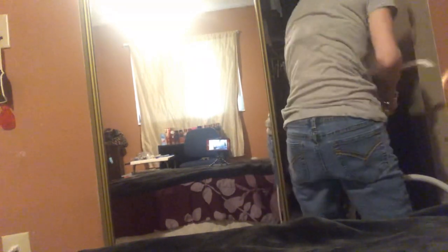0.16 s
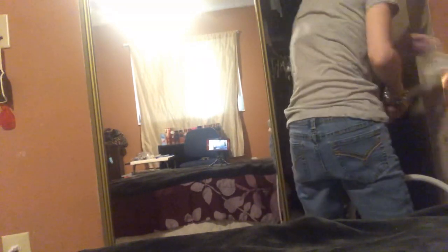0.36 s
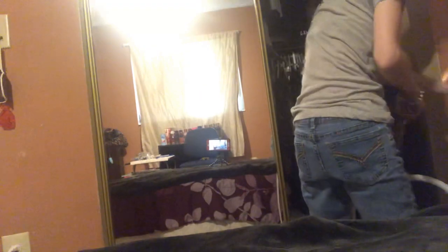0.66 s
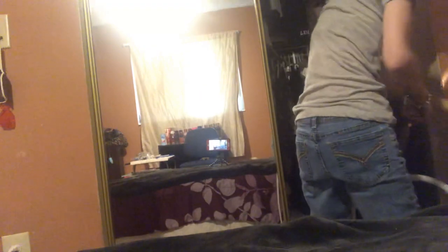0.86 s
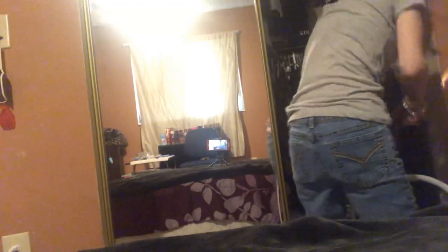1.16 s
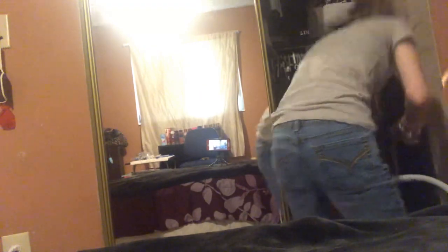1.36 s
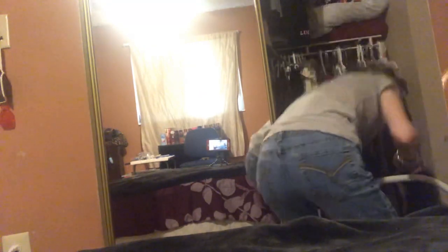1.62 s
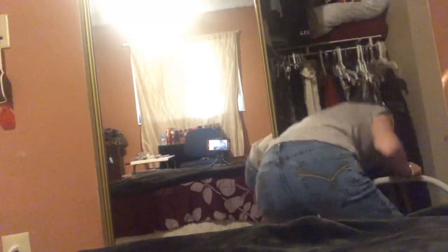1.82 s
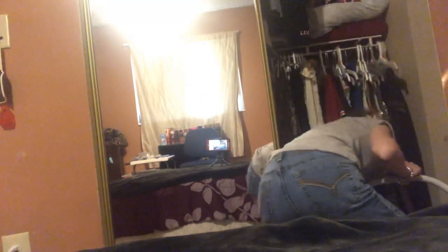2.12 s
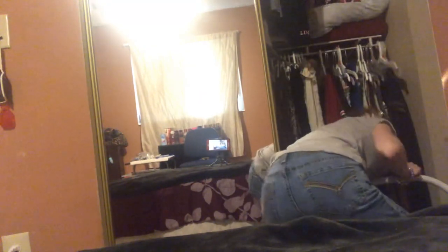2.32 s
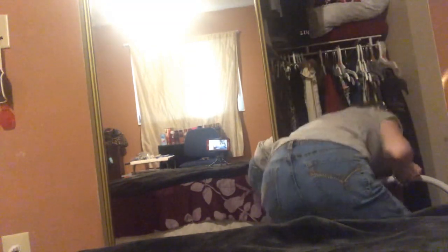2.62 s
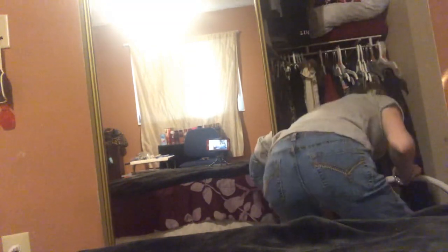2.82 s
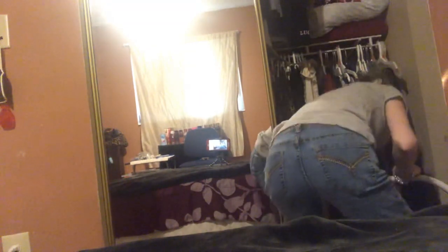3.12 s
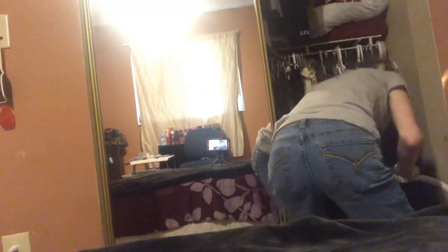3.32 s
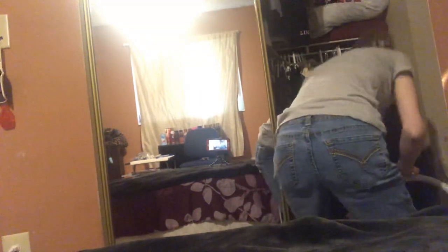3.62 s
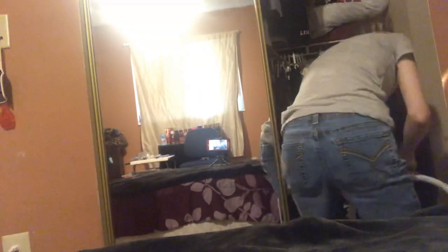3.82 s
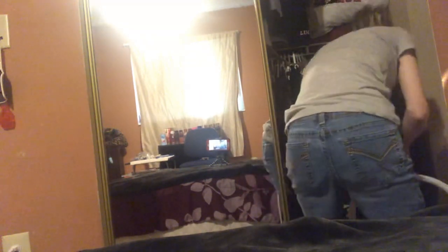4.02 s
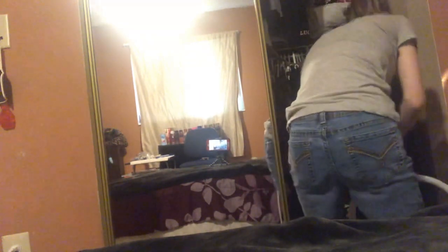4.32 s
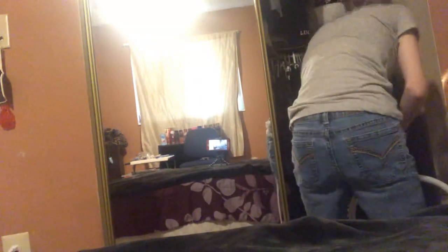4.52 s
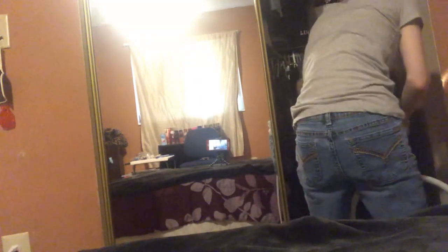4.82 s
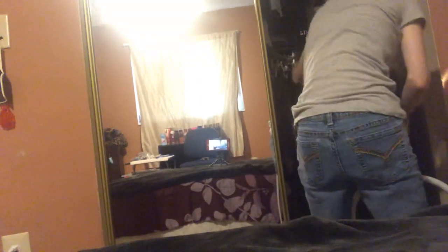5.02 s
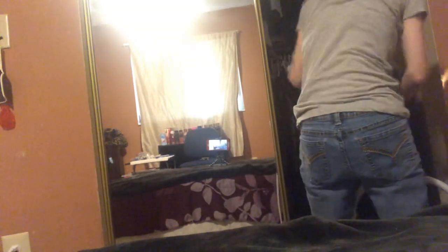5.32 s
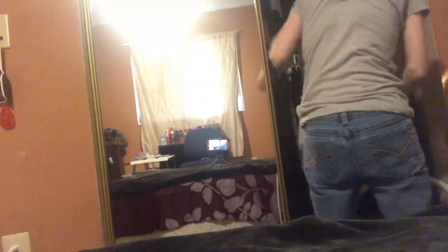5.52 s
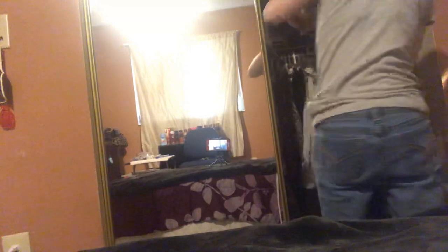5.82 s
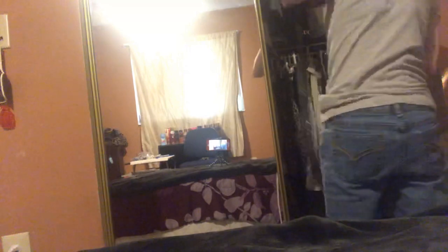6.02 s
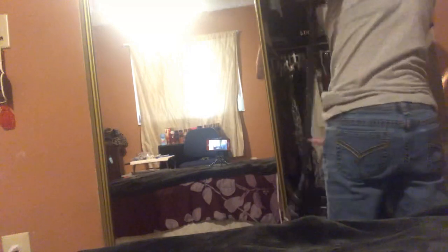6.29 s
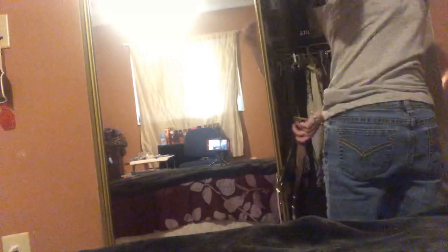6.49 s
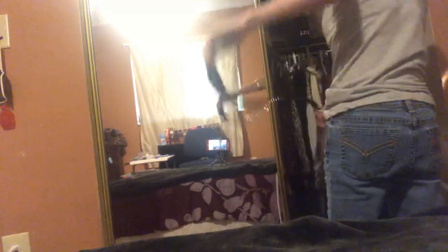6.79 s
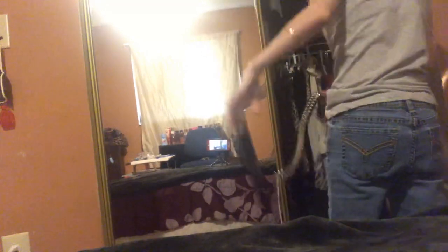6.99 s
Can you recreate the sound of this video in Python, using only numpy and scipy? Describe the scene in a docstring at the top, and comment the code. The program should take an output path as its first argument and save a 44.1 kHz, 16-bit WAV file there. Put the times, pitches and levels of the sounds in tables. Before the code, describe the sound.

Scattered hanger clicks and soft cloth rustling in a quiet bedroom, small metal jingles, then two loud clattering knocks with a ringing, booming rail.

```python
"""A small soft bedroom closet over a low house rumble and faint hiss, both slowly wavering noise.
Boards thump and thin wire pings (decaying modes), then hangers knock together (ticks and rattle in noise bands).
Cloth is shaken, dragged and lightly bumped (fluttering octaves of noise, low modes), a hook scrapes along
the rail (stick-slip noise), a metal belt buckle jingles and later a plastic hanger taps (decaying modes).
Near the end two hard blows ring the rail in long modes, boom in floor or wall, and set the clothes shaking."""
import sys
import numpy as np
from scipy import signal
from scipy.fft import rfft, irfft, next_fast_len
from scipy.io import wavfile
from scipy.ndimage import uniform_filter1d

SR = 44100
rng = np.random.default_rng(int(sys.argv[2]) if len(sys.argv) > 2 else 0)


def ratio(d):
    """dB to gain"""
    e = np.asarray(d, float) / 20
    return 10 ** e


def waveform_to_disk(signal):
    """Save audio, clipped to [-1, 1], as 16-bit WAV at the path in sys.argv[1]."""
    frames = np.transpose(np.atleast_2d(signal))
    scaled = np.clip(frames, -1, 1) * 32767
    samples = np.round(scaled).astype(np.int16)
    wavfile.write(sys.argv[1], SR, samples)


N = 315315
TIME = np.arange(N) / SR

# Levels are relative; brightness tilts the modes about a pivot pitch.
# house rumble and hiss, spectrum: f/Hz, density level/dB per Hz
HOUSE_SPECTRUM = [(15, -68), (25, -51), (48, -12), (70, -7), (97, -9.5), (309, -9.5), (405, -16),
                  (451, -21), (780, -26), (1100, -29), (2840, -38), (5880, -38.5), (7800, -40.5),
                  (8400, -46.5), (15300, -45.5), (16000, -56)]
HOUSE_DB = -60
# thumps on the closet boards, and a few low bumps of moving cloth: t/s, level/dB, brightness/dB per octave
THUMPS_AND_BUMPS = [(0.19, -67, -1), (0.262, -48, -2.5), (.305, -63, 7), (.937, -48.5, -11),
                    (1.619, -57.5, 7.5), (1.866, -62, 4), (2.77, -59, 9), (2.97, -60.5, 10.5),
                    (3.069, -60, 7), (3.911, -49.5, -1), (4.094, -51, 12.5), (4.949, -51, 6),
                    (5.847, -44, 5), (5.944, -51, 8.5), (6.194, -56, 2), (6.251, -54.5, 8.5),
                    (6.437, -54, 12), (6.537, -28.5, 9.5), (6.759, -45, 15)]
# low modes of boards, used for the cloth bumps too: f/Hz, level/dB, t60/s
BOARD_MODES = [(164, -6, 0.079), (351.6, 1.5, .11), (535, -7.5, 0.083), (732, -2, 0.039), (862, 2, 0.026)]
THUMP_PUSH_S, TAP_PUSH_S = 0.0027, 0.001
# reverberation of the room: f/Hz, t60/s
ROOM_T60 = [(150, 1), (700, 0.21), (2000, 0.32), (5000, 0.27), (13000, 0.14)]
ROOM_DB = -29.5
# pings of thin wire, and a few single clinks of the buckle near 3, 4.9 and 5.6 kHz: t/s, level/dB, f/Hz
PINGS = [(.305, -72, 9100), (1.704, -73, 11500), (3.57, -52.5, 11640), (3.64, -54, 11700),
         (4.163, -39, 11300), (4.19, -51, 11200), (4.32, -59, 11500), (4.97, -59, 11370),
         (5.24, -63, 11700), (5.342, -59, 11500), (5.847, -42, 4880), (5.847, -40, 11960),
         (5.943, -44, 11500), (5.944, -41, 5605), (5.944, -54, 3010), (4.6, -57, 11500),
         (5.13, -58, 11500), (1.704, -71, 10500)]
PING_T60_S, PING_AT_HZ, PING_DAMPING_POWER = 0.085, 11500, 1.6  # higher pings die sooner
PING_SPREAD, PING_LONGEST_S = .02, .2  # spread as a share of the pitch
# hangers knocking: t/s, crack level/dB, crack f/Hz, body level/dB, top level/dB
HANGER_KNOCKS = [(.6761, -26, 4470, -34, -43), (.706, -29, 5330, -33, -47), (0.7163, -43, 5530, -34, -50),
                 (0.7986, -34, 5070, -46.5, -44), (0.9321, -30.5, 3570, -26, -28),
                 (0.9369, -23, 5020, -24, -30.5), (0.961, -53, 3530, -49, -47),
                 (1.0465, -34, 5900, -41.5, -48), (1.735, -44.5, 6100, -40, -37),
                 (1.8647, -38.5, 6240, -50, -39.5), (1.9253, -51, 7000, -58, -58),
                 (1.9678, -46, 6000, -51, -67), (1.9973, -45.5, 5600, -51, -66),
                 (2.67, -43, 6400, -58, -56), (3.203, -39, 6200, -62, -72), (3.821, -41, 7100, -75, -58),
                 (3.913, -35, 6900, -48, -49), (3.9237, -43, 3630, -31.5, -33.5),
                 (4.0941, -33.5, 3630, -65, -36.5), (4.098, -31, 3700, -69, -54),
                 (4.157, -48, 2600, -49, -54), (4.19, -49, 2600, -55, -60), (4.226, -57, 2800, -54, -60),
                 (4.244, -43, 2620, -64, -61.5), (4.2573, -37, 2550, -58, -55), (4.28, -45, 2650, -64, -60),
                 (5.3394, -58, 7500, -79, -50), (5.369, -46, 4550, -76, -63),
                 (5.846, -25.5, 5440, -28, -43), (5.9436, -30, 6100, -32.5, -43),
                 (6.14, -56.5, 6950, -80, -63), (6.333, -50.5, 5660, -61, -66),
                 (6.436, -40.5, 5500, -74, -54), (6.537, -14, 5170, -20.5, -28.5),
                 (6.735, -60, 7000, -70, -48.5), (6.7583, -18.5, 4700, -28, -40),
                 (6.91, -63, 7500, -86.5, -70.5), (6.955, -56.5, 7460, -84, -64)]
# bass, body and top bands of a knock: low f/Hz, high f/Hz
KNOCK_BANDS = (280, 800), (800, 2500), (8000, 16000)
BASS_BELOW_BODY_DB = 17
# clothes set shaking by the hardest knocks:
# t/s, level/dB, fall/dB per s, heaviness/dB per two octaves below 2500 Hz, crispness/dB per two octaves above
CLOTH_SHAKES = [(.74, -37, 77, -26, -35), (.96, -50, 120, -5, 8.5), (6.562, -41, 74.5, 5.5, -4),
                (6.768, -39, 123, 5, -4)]
SHAKE_RISE_DB_PER_S = 448
# cloth dragged about: t/s, level/dB, crispness/dB per two octaves above 2500 Hz
CLOTH_DRAGS = [(1.3, -77, -8), (1.63, -67, 3), (1.8, -75, -13), (2.01, -54.5, 3), (2.16, -65, 1.5),
               (2.48, -72.5, 3), (2.66, -53, 1), (2.78, -53.5, 0.5), (3.03, -52.5, -1), (3.09, -47, -2.5),
               (3.19, -47.5, 3), (3.24, -49.5, -7), (3.29, -47, -2.5), (3.33, -39, -1), (3.49, -57.5, 2.5),
               (3.59, -47, 0), (3.88, -58, 0), (4.04, -53, -3), (4.15, -52, -3), (4.23, -45, -9),
               (4.32, -51, 0.5), (4.46, -60.5, 2), (4.55, -52, -1.5), (4.68, -50.5, -5), (4.76, -56, -3),
               (5.05, -47.5, -2.5), (5.36, -58.5, -10.5), (5.45, -70, -1), (5.48, -59, 8),
               (5.55, -54.5, 6.5), (5.69, -53, 9), (5.83, -62.5, 5), (5.95, -61.5, 19.5), (6.12, -74, -3),
               (6.5, -77, 8), (6.95, -75.5, 12), (7.15, -68, 5)]
DRAG_HEAVY_DB = -0.5  # per two octaves below 2500 Hz
# tone of rubbing cloth: f/Hz, density level/dB per Hz
CLOTH_TONE = [(88, -37), (150, -7), (172, -5.5), (354, -1.5), (637, -6.5), (1240, -6.5), (1600, -7),
              (4860, -10), (8560, -16), (15100, -26), (16000, -26)]
# jerks of a hook scraping along the rail: t/s, level/dB
HOOK_JERKS = [(1.388, -65), (1.446, -65), (1.52, -78), (1.552, -64), (1.606, -70), (6.252, -67),
              (6.288, -70), (6.34, -59.5), (6.437, -56.5), (6.52, -80)]
JERK_RISE_DB_PER_S, JERK_FALL_DB_PER_S = 700, 203
# scrape resonances of wire and rail: f/Hz, width/Hz, level/dB
SCRAPE_RESONANCES = [(2920, 850, -3.5), (5270, 1240, 6.5), (6080, 410, -7.5)]
# a metal belt buckle jingling: t/s, level/dB, brightness/dB per octave
BUCKLE_JINGLES = [(1.7353, -49.5, -5.5), (1.867, -49.5, -5), (1.9669, -69, 4), (1.9979, -57, 0),
                  (3.8193, -54.5, 4), (3.916, -59.5, 15), (3.9238, -61, -11), (4.094, -49.5, -8)]
# modes of the buckle: f/Hz, level/dB, t60/s
BUCKLE_MODES = [(950, -10, .13), (2035, -11, .08), (3400, -13, .08), (5730, -6, .22), (5940, -2, .16),
                (7060, -5, .13), (7540, -12, .1), (9320, -16, .1), (11630, -12, .08), (13550, -13, .08),
                (15700, -18, .07)]
# taps of a plastic hanger: t/s, level/dB, brightness/dB per octave
PLASTIC_TAPS = [(4.162, -47, -14), (4.229, -45.5, 13), (4.257, -41, 1), (4.28, -53, 0)]
# modes of the plastic: f/Hz, level/dB, t60/s
PLASTIC_MODES = [(1197, 1.5, 0.038), (2250, 0, .04), (2420, -0.5, 0.039), (3300, -8, .03)]
# hard blows on the rail: t/s, level/dB, brightness/dB per octave, share of free ring time under resting cloth
RAIL_BLOWS = [(6.536, -28.5, 4.5, 0.69), (6.757, -37, 2.5, 0.86)]
# modes of the rail, and a low boom of floor or wall at 121 Hz: f/Hz
RAIL_BOOM = 121, 252, 378, 447, 717, 809, 874, 1039, 1701, 2740, 4350, 5227, 5461, 5793, 6208, 11650, 15310
# ring of each of these modes when free: level/dB, t60/s
RAIL_BOOM_RING = [(-3, .4), (2, 1.2), (-1, 1.2), (8, 0.67), (-1, 1.7), (-3.5, 1.07), (-19.5, 0.24),
                  (-14, 0.31), (-13.5, 1.57), (-14, 1.2), (-6, 0.7), (-6, 0.52), (3, 0.18), (9.5, 0.075),
                  (4, 0.12), (-11, 0.34), (-10, 0.17)]
RAIL_WOBBLE_DB = 1.5


def level(x, db):
    """Scale to an rms level."""
    return x * ratio(db) / np.sqrt(np.mean(x ** 2))


def at_hz(table, hz):
    """Read a (Hz, value) table on a log-frequency axis."""
    table_hz, values = np.transpose(table)
    return np.interp(np.log(hz), np.log(table_hz), values)


def hiss(lo_hz, hi_hz, size=N):
    """Band of noise with rms 1."""
    sos = signal.butter(2, [lo_hz, min(hi_hz, .45 * SR)], "band", fs=SR, output="sos")
    return level(signal.sosfilt(sos, rng.standard_normal(size)), 0)


def coloured(table):
    """Noise with the spectrum of a (Hz, dB) table, rms 1."""
    size = next_fast_len(N)
    hz = np.maximum(np.arange(size // 2 + 1) * SR / size, 1)
    spectrum = rfft(rng.standard_normal(size)) * ratio(at_hz(table, hz))
    return level(irfft(spectrum, size)[:N], 0)


def walk(rate):
    """Random levels held 1 / rate s and slewed twice; spread near 1."""
    hold = int(SR / rate)
    steps = np.repeat(rng.standard_normal(N // hold + 1), hold)
    return 1.3 * uniform_filter1d(uniform_filter1d(steps, hold), hold)[:N]


def swell(s, db, rise_db, fall_db):
    """Level in dB that climbs to a peak at time s and then sinks; slopes per second."""
    return db - np.maximum(rise_db * (s - TIME), fall_db * (TIME - s))


def add(out, s, hz, db, t60, push_s=0):
    """Decaying modes set ringing at time s; a soft contact eases them in."""
    start = int(s * SR)
    t = TIME[:min(N - start, int(1.2 * np.max(t60) * SR))]
    hz, db, t60 = (np.reshape(v, (-1, 1)) for v in (hz, db, t60))
    modes = ratio(db - 60 * t / t60) * np.sin(2 * np.pi * hz * t)
    out[start:start + len(t)] += np.sum(modes, axis=0) * np.tanh(t / (push_s + 1e-5))


def strike(hz, mode_db, t60, blows, pivot_hz=3000, push_s=0):
    """Every blow lands elsewhere and weights the modes anew; brightness tilts them about the pivot."""
    out = np.zeros(N)
    spots = rng.standard_normal((len(blows), len(hz)))
    for (s, db, bright, *free), spot in zip(blows, spots):
        blow_db = db + mode_db + bright * np.log2(hz / pivot_hz) + 1.5 * spot
        add(out, s, hz, blow_db, t60 * np.prod(free), push_s)
    return out


def house():
    """Distant rumble and the hiss of the microphone, slowly wavering together."""
    return level(coloured(HOUSE_SPECTRUM) * ratio(1.7 * walk(2.3)), HOUSE_DB)


def thumps_and_bumps():
    """Soft thumps on the boards, and low bumps of moving cloth, excite low, short modes."""
    return strike(*np.transpose(BOARD_MODES), THUMPS_AND_BUMPS, pivot_hz=350, push_s=THUMP_PUSH_S)


def room():
    """Direct sound, then a dense tail that dies at its own pace in each octave."""
    t = TIME[:SR // 2]
    tail = 0
    for hz in 90 * 2 ** np.arange(0, 8.):
        octave = hiss(hz / np.sqrt(2), hz * np.sqrt(2), size=len(t))
        tail = tail + octave * (hz / 15000) ** 0.57 * ratio(-60 * t / at_hz(ROOM_T60, hz))
    # reflections need a few milliseconds to arrive
    response = ratio(ROOM_DB) * tail * np.clip(t / 0.0039, 0, 1)
    response[0] = 1
    return response


def pings():
    """Each ping rings as a bunch of close tones."""
    out = np.zeros(N)
    for (s, db, hz), bunch in zip(PINGS, rng.standard_normal((len(PINGS), 4))):
        t60 = min(PING_T60_S * (PING_AT_HZ / hz) ** PING_DAMPING_POWER, PING_LONGEST_S)
        bunch_hz = hz * (1 + PING_SPREAD * (bunch - bunch[0]))
        add(out, s, bunch_hz, db - np.array([2, 6, 7, 8]), t60 / np.array([1, 1.5, 2, 2]), TAP_PUSH_S)
    return out


def knocks():
    """Each knock is a sharp tick and a short rattle, shaped by a broad crack resonance and three bands."""
    out, t = np.zeros(N), TIME[:SR // 16]
    chances = rng.standard_normal((len(HANGER_KNOCKS), len(t)))
    for (s, crack_db, hz, body_db, top_db), chance in zip(HANGER_KNOCKS, chances):
        # harder knocks rattle longer
        rattle_s = .003 * ratio(.4 * (crack_db + 35))
        contact = 1.004 * chance * np.exp(-t / rattle_s) * np.tanh(t / (.3 * rattle_s))
        contact[0] = 1.96  # the tick
        edges = [(hz / 1.5, hz * 1.325), *KNOCK_BANDS]
        band_db = [crack_db, body_db - BASS_BELOW_BODY_DB, body_db, top_db]
        start = int(s * SR)
        # neighbouring bands alternate in sign so that they add up where they meet
        for (lo, hi), db, sign in zip(edges, band_db, (1, 1, -1, -1)):
            band = signal.sosfilt(signal.butter(2, [lo, hi], "band", fs=SR, output="sos"), contact)
            # narrow bands are raised to make up for the noise they let through
            out[start:start + len(t)] += sign * ratio(db) * np.sqrt(SR / 2 / (hi - lo)) * band
    return out


def cloth():
    """Fibres rub in octave bands that flutter alone; heavy folds fill the bass, crisp weave the top."""
    s, drag_db, crisp_db = np.transpose(CLOTH_DRAGS)
    drag = np.interp(TIME, s, drag_db, -110, -110)
    moves = [(drag, DRAG_HEAVY_DB, np.interp(TIME, s, crisp_db))]
    for s, db, fall, heavy, crisp in CLOTH_SHAKES:
        moves.append((swell(s, db, SHAKE_RISE_DB_PER_S, fall), heavy, crisp))
    out, power = 0, 0
    flutter_db = .8 * walk(25)  # shared by all bands
    for hz in 180 * 2 ** np.arange(0, 7.):
        octaves = np.log2(hz / 2500)
        below, above = max(-octaves, 0), max(octaves, 0)
        tone = ratio(at_hz(CLOTH_TONE, hz) + 10 * np.log10(hz))
        effort = sum(ratio(db + heavy * below / 2 + crisp * above / 2) for db, heavy, crisp in moves)
        # tiny snaps of thread make the hiss grainy
        grain = ratio(1.57 * walk(14) + 0.93 * walk(300))
        out = out + tone * effort * grain * hiss(hz / np.sqrt(2), hz * np.sqrt(2))
        power = power + tone ** 2
    # creases let go at random, about 45 a second, each a few milliseconds of louder hiss
    creases = (rng.random(N) < 45 / SR) * ratio(3 * rng.exponential(size=N))
    crackle = signal.lfilter([1], [1, -np.exp(-1 / (0.0015 * SR))], creases)
    return out / np.sqrt(power) * (1 + 0.29 * crackle) * ratio(flutter_db)


def slides():
    """Stick-slip of the hook excites a few broad resonances of wire and rail."""
    rub = sum(ratio(db) * hiss(hz - width / 2, hz + width / 2) for hz, width, db in SCRAPE_RESONANCES)
    stick_slip = ratio(2.5 * walk(80))
    jerks = sum(ratio(swell(s, db, JERK_RISE_DB_PER_S, JERK_FALL_DB_PER_S)) for s, db in HOOK_JERKS)
    return level(rub * stick_slip, 0) * jerks


def buckle():
    """Hard contacts ring the modes of a metal belt buckle."""
    return strike(*np.transpose(BUCKLE_MODES), BUCKLE_JINGLES)


def plastic():
    """Taps excite the strongly damped modes of a plastic hanger."""
    return strike(*np.transpose(PLASTIC_MODES), PLASTIC_TAPS, pivot_hz=1700, push_s=TAP_PUSH_S)


def rail_and_boom():
    """Hard blows ring the rail and boom in floor or wall, with shortened decays and a wobbling level."""
    ring = strike(np.array(RAIL_BOOM), *np.transpose(RAIL_BOOM_RING), RAIL_BLOWS)
    return ring * ratio(RAIL_WOBBLE_DB * walk(28))


def scene():
    """Knocks and ringing parts fill the room; the long rail tones and the rubbing are already diffuse."""
    # the parts swing and chatter while they sound, so their tones are rough
    ringing = (thumps_and_bumps() + pings() + buckle() + plastic()) * ratio(4.5 * walk(400))
    struck = signal.fftconvolve(knocks() + ringing, room())[:N]
    # thin things radiate no deep bass
    no_bass = signal.butter(2, 90, "high", fs=SR, output="sos")
    thin = signal.sosfilt(no_bass, struck + rail_and_boom())
    return (thin + cloth() + slides() + house())[None]


def roll_off(x):
    """The treble ends steeply here."""
    return signal.sosfilt(signal.butter(12, 16820, fs=SR, output="sos"), x)


def record(dry):
    """Deliver the finished mix."""
    return roll_off(dry)


dry = scene()
out = record(dry)
waveform_to_disk(out)
```